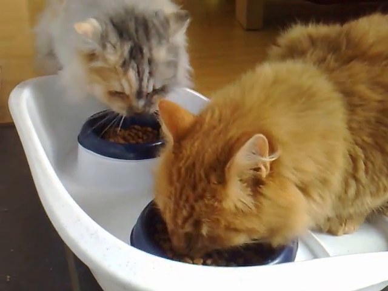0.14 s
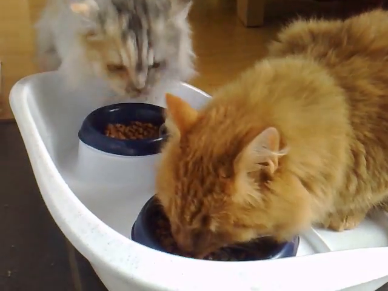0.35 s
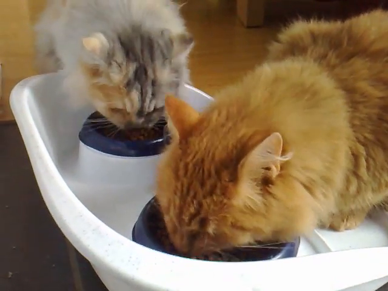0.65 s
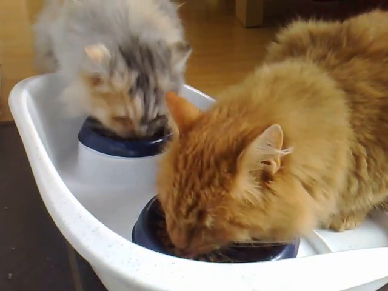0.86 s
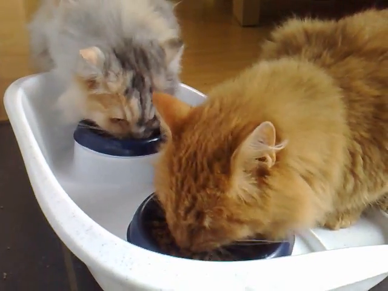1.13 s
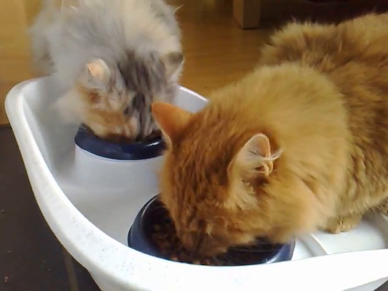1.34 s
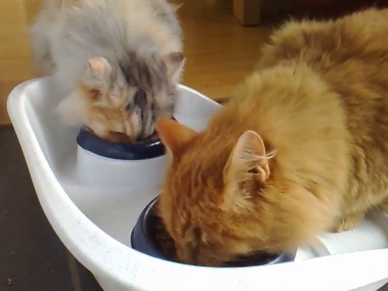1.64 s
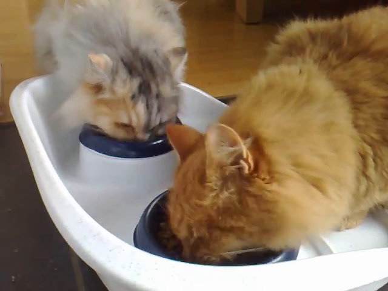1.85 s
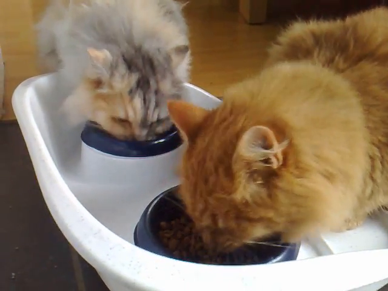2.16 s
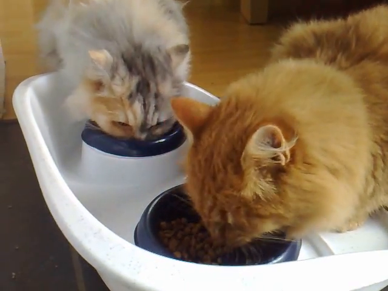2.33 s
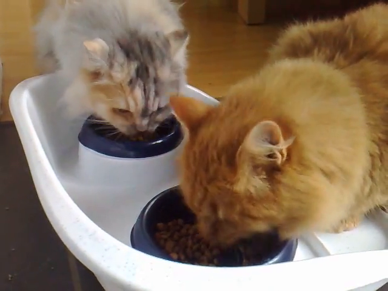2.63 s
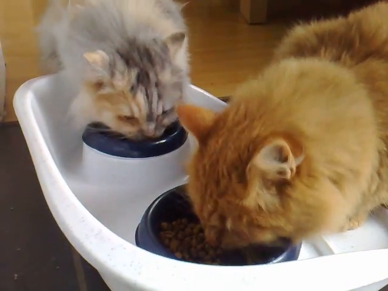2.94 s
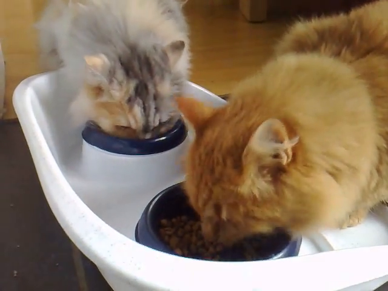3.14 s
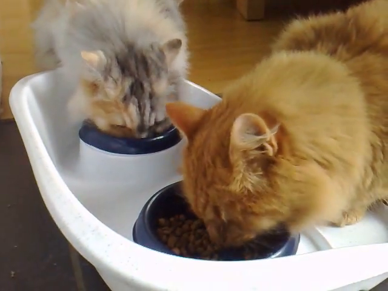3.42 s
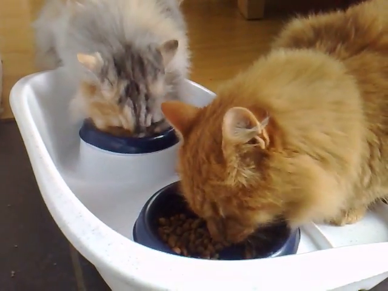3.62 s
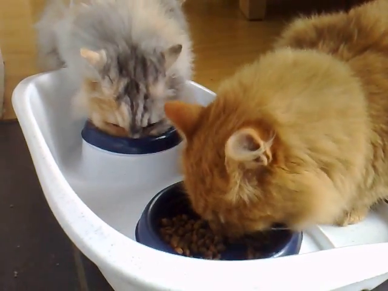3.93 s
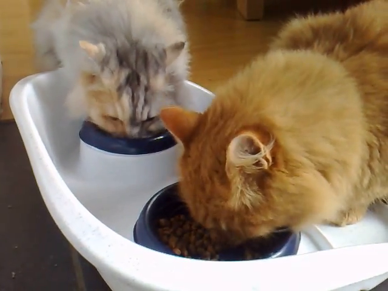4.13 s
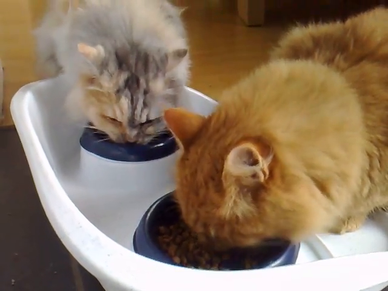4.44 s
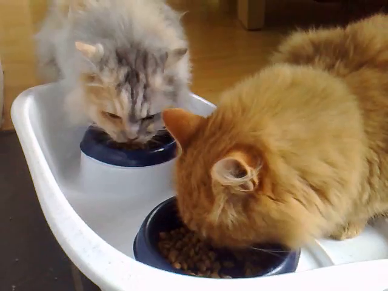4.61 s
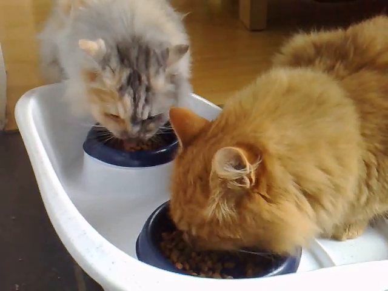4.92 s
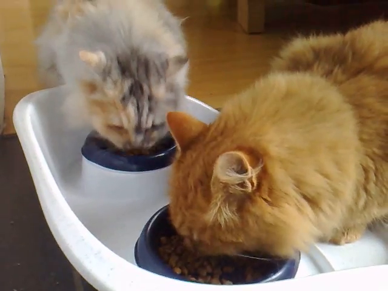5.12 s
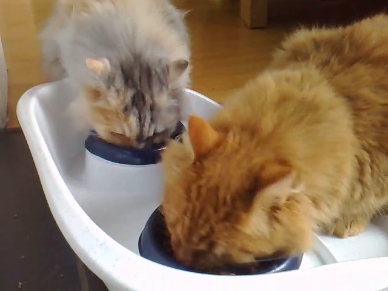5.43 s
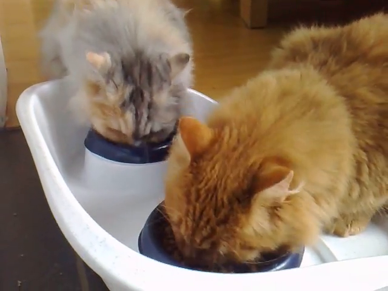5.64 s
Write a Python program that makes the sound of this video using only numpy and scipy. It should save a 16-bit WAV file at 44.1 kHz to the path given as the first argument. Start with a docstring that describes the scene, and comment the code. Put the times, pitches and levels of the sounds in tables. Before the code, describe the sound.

Two cats eat dry kibble from bowls in a plastic tray, indoors and close to a small microphone. Pellets crack crisply between teeth, and knock and shuffle against the bowls in irregular clusters. The eating is busy at first, softens past the middle, then picks up again. Twice a push gives the tray a soft low thud. A faint, steady motor whine and low room noise run underneath.

```python
"""Indoors, close to a small microphone, two cats eat dry kibble from bowls set in a plastic tray.
Pellets crack between teeth, knock and shuffle against the bowls, whose few low modes ring briefly;
twice a push sets the tray swinging. A small fan or motor whines steadily in narrow bands of noise
over rumble, hiss and a faint mains hum."""
import sys
import numpy as np
from scipy import signal
from scipy.fft import rfft, irfft
from scipy.io import wavfile

SR = 44100
rng = np.random.default_rng(int(sys.argv[2]) if len(sys.argv) > 2 else 0)


def wav_out(sig):
    """Save sig, one row per channel (or a flat mono array), as 16-bit PCM at SR to the path in sys.argv[1]."""
    wavfile.write(sys.argv[1], SR, np.round(np.clip(np.atleast_2d(sig).T, -1, 1) * 32767).astype(np.int16))


N = 254456

# The ring of bowl and tray. Each row: pitch in Hz, relative level in dB, t60 in seconds.
BOWL_MODES = [(333, -10.5, 0.02), (440, -6, 0.024), (500, -8, 0.018), (599, -7.5, 0.038),
              (724, -6.5, 0.021), (1020, -3.5, 0.029), (1180, -3, 0.022), (1382, -0.5, 0.019),
              (1800, 4, 0.011)]
# The click of dry pellet and teeth. Each row: pitch in Hz, relative level in dB, t60 in seconds.
PELLET_MODES = [(2060, 1.5, 0.0024), (3440, -3.5, 0.0041), (4250, -5, 0.0034), (5030, -2.5, 0.0026),
                (6210, -10, 0.0085), (7570, -18, 0.0053)]


def from_db(db):
    """Decibels to gain."""
    return 10 ** (np.asarray(db) / 20)


def unit_rms(x):
    """The signal scaled to an rms of 1."""
    return x / np.sqrt(np.mean(x ** 2) + 1e-20)


def high_pass(x, hz):
    """Small bodies radiate little below their lowest mode."""
    return signal.sosfilt(signal.butter(4, hz, "high", fs=SR, output="sos"), x)


def soften(x):
    """Rounded contacts carry little treble, and the bowl radiates little bass."""
    return high_pass(signal.sosfilt(signal.butter(2, 2300, fs=SR, output="sos"), x), hz=250)


def ring(clicks, hz, t60):
    """Each click sets a damped sine ringing."""
    r, w = from_db(-60 / (t60 * SR)), 2 * np.pi * hz / SR
    return signal.lfilter([0, np.sin(w)], [1, -2 * r * np.cos(w), r * r], clicks + 1e-18)


def drift(rate_hz):
    """A smooth random wander with a spread of about 1."""
    r = np.exp(-2 * np.pi * rate_hz / SR)
    return unit_rms(signal.lfilter([1], [1, -2 * r, r * r], rng.standard_normal(N + SR)))[SR:]


def bursts(times, peaks, hz, t60, rise_s, decay_s, clicks_per_s):
    """Each contact is a quick swell of uneven clicks that rings one mode up to the given peak."""
    t = np.arange(SR // 8) / SR
    swell = (1 - np.exp(-(t + 1 / SR) / rise_s)) * np.exp(-t / decay_s)
    hits = rng.random((len(times), len(t))) < clicks_per_s / SR
    clicks = hits * rng.standard_normal(hits.shape) * swell
    out = np.zeros(N + len(t))
    for start_s, peak, ringing in zip(times, peaks, ring(clicks, hz, t60)):
        start = round(start_s * SR)
        out[start:start + len(t)] += peak * ringing / np.max(np.abs(ringing))
    return out[:N]


def grains(modes, per_s, spread_db):
    """Random small contacts, a few larger than the rest, dealt among the modes; one row a mode."""
    sizes = from_db(spread_db * np.minimum(rng.exponential(1, N), 4)) * rng.choice([-1, 1], N)
    clicks = sizes * (rng.random(N) < per_s / SR)
    dealt = rng.integers(0, len(modes), N)
    rings = [from_db(db) * ring(clicks * (dealt == k), hz, t60) for k, (hz, db, t60) in enumerate(modes)]
    return unit_rms(np.array(rings)) / np.sqrt(len(modes))


def nearness(hz, centre_hz, db_per_octave):
    """A mode rings less the further it lies from where a blow is strongest."""
    return from_db(-db_per_octave * np.abs(np.log2(hz / centre_hz)))


def motor_whine():
    """A small fan or motor sings in narrow noise resonances, its level fluttering a little."""
    # The bands of the whine. Each row: centre in Hz, width in Hz, level in dB.
    bands = [(1622, 53, -65.5), (1707.4, 106, -57), (1834, 107, -66), (2120, 22, -74.5), (4050, 440, -68.5),
             (6194, 220, -69.5), (8120, 91, -80.5)]
    out, flutter_db = np.zeros(N), 2.14 * drift(rate_hz=39)
    for hz, width_hz, level_db in bands:
        r = np.exp(-np.pi * width_hz / SR)
        band = rng.standard_normal(N)
        for _ in range(2):   # twice through, for steep skirts
            band = signal.lfilter([1, 0, -1], [1, -2 * r * np.cos(2 * np.pi * hz / SR), r * r], band)
        out += from_db(level_db) * unit_rms(band)
    return out * from_db(flutter_db)


def room_tone(level_db=-58):
    """Room rumble and microphone hiss make one steady bed of coloured noise."""
    # The colour of the bed. Each row: frequency in Hz, relative noise density in dB.
    curve = [(20, 1), (45, -10), (120, 2.5), (250, -5.5), (600, -9), (950, -13.5), (1500, -8.5),
             (2400, -13), (3400, -16), (5200, -19), (7500, -17.5), (9800, -24.5), (15500, -21.5)]
    curve_hz, curve_db = np.transpose(curve)
    hz = np.fft.rfftfreq(N, 1 / SR)
    colour = from_db(np.interp(np.log(hz + 1), np.log(curve_hz), curve_db)) * (hz > 15)
    return from_db(level_db) * unit_rms(irfft(rfft(rng.standard_normal(N)) * colour, N))


def mains_hum():
    """The mains hums in two low tones, each wavering slightly in phase."""
    # The tones of the hum. Each row: pitch in Hz, rms level in dB.
    tones = [(48.4, -70.5), (96.9, -73)]
    t = np.arange(N) / SR
    return sum(np.sqrt(2) * from_db(db) * np.sin(2 * np.pi * hz * t + 0.26 * drift(rate_hz=4.2))
               for hz, db in tones)


def kibble_shuffle(swell_db_per_s=710, fade_db_per_s=550):
    """Dense pellet contacts drive the bowl, most near one pitch; the sharper ones also click."""
    # Spells of pellets ground and pushed about. Each row: start of full strength in seconds,
    # hold in seconds, bowl rumble in dB, centre of the ring in Hz, pellet crackle in dB.
    spells = [(0.0, 0.017, -43.5, 675, -60), (0.092, 0.087, -53.5, 760, -67),
              (0.27, 0.044, -51.5, 690, -66), (0.39, 0.0075, -49, 680, -62), (0.56, 0.027, -48, 496, -56),
              (0.62, 0.077, -52, 580, -62), (0.754, 0.035, -39.5, 625, -54),
              (0.968, 0.038, -46, 630, -52.5), (1.108, 0.042, -55, 634, -60.5),
              (1.745, .025, -46, 730, -72), (1.854, 0.0059, -36.5, 550, -70),
              (1.945, 0.056, -42.5, 600, -60), (2.02, 0.099, -37, 670, -55.5), (2.18, 0.058, -52, 700, -62),
              (2.375, 0.12, -44.5, 646, -61), (2.706, .01, -48, 760, -72), (3.35, 0.077, -56.5, 472, -82),
              (3.485, 0.027, -53, 440, -82), (3.68, .03, -53.5, 497, -81), (3.808, .01, -58, 487, -65),
              (4.042, 0.02, -52.5, 490, -71), (4.085, 0.015, -46.5, 490, -68), (4.12, 0.054, -58, 505, -64),
              (4.226, 0.042, -44.5, 465, -66), (4.41, 0.054, -58.5, 500, -74),
              (4.74, 0.024, -48.5, 460, -61), (4.8, 0.14, -55, 450, -70), (5.005, 0.0059, -51.5, 810, -62),
              (5.295, 0.069, -45, 690, -60.5), (5.43, .17, -56, 700, -73), (5.679, 0.066, -38.5, 714, -59)]
    t = np.arange(N) / SR
    rumble, crackle, weighted_hz = np.full(N, 1e-12), np.zeros(N), np.zeros(N)
    for start_s, hold_s, rumble_db, centre_hz, crackle_db in spells:
        before_s, after_s = np.maximum(start_s - t, 0), np.maximum(t - start_s - hold_s, 0)
        effort = from_db(-swell_db_per_s * before_s - fade_db_per_s * after_s)
        rumble += from_db(rumble_db) * effort
        weighted_hz += from_db(rumble_db) * effort * centre_hz
        crackle += from_db(crackle_db) * effort
    mode_gains = nearness(np.array(BOWL_MODES)[:, :1], weighted_hz / rumble + 1, db_per_octave=12)
    bowl = np.sum(mode_gains * grains(BOWL_MODES, per_s=6000, spread_db=3.0), axis=0)
    pellets = np.sum(grains(PELLET_MODES, per_s=3300, spread_db=0.5), axis=0)
    return rumble * soften(bowl) + crackle * high_pass(pellets, hz=1190)


def pellet_cracks():
    """A pellet splits in a few milliseconds of fractures that ring its small, heavily damped modes."""
    # Pellets cracking between teeth. Each row: start in seconds, level in dB, centre in Hz,
    # top octave in dB against that level.
    bites = [(0.0144, -38.5, 2330, -33), (0.054, -30, 4440, -40), (0.079, -29, 3500, -37),
             (0.2965, -39.5, 3870, -25), (0.389, -31.5, 2760, -36), (0.532, -29.5, 3800, -39),
             (0.5755, -28.5, 3270, -37), (0.614, -41, 4010, -25), (0.6544, -35.5, 4140, -27),
             (0.7388, -21.5, 5100, -13), (0.753, -31, 3240, -18), (0.9642, -35.5, 3820, -25),
             (0.9986, -34, 5100, -17), (1.107, -29.5, 3840, -21), (1.1333, -33.5, 5840, -32),
             (1.7545, -30.5, 3970, -33), (2.001, -42, 4320, -24), (2.0186, -33, 3600, -28),
             (2.038, -26, 5040, -10), (2.0463, -26, 5030, -22), (2.1127, -35.5, 4900, -32),
             (2.1797, -27.5, 3670, -36), (2.207, -33.5, 3020, -28), (2.2588, -39.5, 3850, -27),
             (2.378, -41, 4080, -26), (2.387, -41.5, 3360, -21), (2.426, -25, 2140, -5),
             (2.4659, -22.5, 3180, -39), (2.6941, -14.5, 5250, -2), (2.6988, -31, 5550, 8),
             (2.7475, -39, 3720, -23), (2.853, -29.5, 3380, -37), (3.061, -32.5, 6060, -14),
             (4.087, -45, 4500, -25), (4.153, -48, 3600, -25), (4.2025, -44, 5200, -23),
             (4.2707, -41, 4200, -25), (4.389, -34.5, 4250, -31), (4.7452, -30, 3440, -39),
             (4.7558, -37, 3660, -26), (4.8913, -36, 3420, -27), (5.1495, -45, 5000, -22),
             (5.5512, -29, 4400, -43), (5.673, -38, 3160, -27), (5.6857, -41, 5230, -29),
             (5.693, -40, 5040, -27), (5.7004, -35, 4000, -28), (5.7477, -32, 3010, -31)]
    # The crisp top octave of a crack. Each row: pitch in Hz, relative level in dB, t60 in seconds.
    top_modes = [(7900, 4.5, 0.00043), (10000, -14, 0.0018), (10220, -1.5, 0.0025), (12400, -12, 0.0014),
                 (14900, -22, 0.0016)]
    starts, level_db, centre_hz, top_db = np.transpose(bites)
    fractures = dict(decay_s=0.0014, clicks_per_s=11000)
    out = np.zeros(N)
    for hz, mode_db, t60 in PELLET_MODES:
        peaks = from_db(level_db + mode_db) * nearness(hz, centre_hz, db_per_octave=16)
        out += bursts(starts, peaks, hz, t60, rise_s=0.00039, **fractures)
    for hz, mode_db, t60 in top_modes:
        peaks = from_db(level_db + top_db + mode_db)
        out += bursts(starts, peaks, hz, t60, rise_s=0.00006, **fractures)
    return high_pass(out, hz=810)


def bowl_knocks():
    """Pellets and muzzles bump the bowls and set their modes ringing in a short, soft rattle."""
    # Bumps on the bowls. Each row: start in seconds, level in dB, centre of the ring in Hz,
    # fall-off from that centre in dB per octave.
    knocks = [(0.055, -32, 690, 10), (0.079, -35, 1040, 5.5), (0.3, -43, 1060, 10), (0.329, -37.5, 590, 17),
              (0.39, -40, 766, 10), (0.502, -37.5, 525, 11), (0.533, -37.5, 750, 14),
              (0.561, -33.5, 1460, 2), (0.575, -33, 1370, 11), (0.699, -39.5, 607, 6),
              (0.74, -32, 1180, 17), (0.752, -38.5, 533, 5), (0.763, -40, 600, 1), (0.965, -45, 595, -1.5),
              (1.109, -40.5, 650, 17), (1.708, -40.5, 620, 14), (1.756, -27.5, 685, 13.5),
              (1.845, -27.5, 860, 17), (1.939, -40, 1020, 10), (1.961, -37, 564, 4.5),
              (2.021, -30.5, 592, 7.5), (2.044, -35, 622, 2), (2.179, -34, 940, 18),
              (2.208, -34.5, 447, 11), (2.26, -41.5, 1020, 12), (2.367, -41.5, 453, 2),
              (2.389, -32.5, 401, 5), (2.425, -36.5, 1440, -0.5), (2.467, -31, 790, 10),
              (2.696, -29.5, 650, 8.5), (2.853, -36.5, 1020, 16), (3.063, -45.5, 1020, 23),
              (3.432, -39.5, 480, 21), (3.489, -36.5, 400, 17), (3.705, -38.5, 493, 21),
              (3.803, -44, 425, 11), (4.041, -37, 490, 18), (4.09, -33, 480, 10), (4.225, -35.5, 428, 16),
              (4.452, -46.5, 425, 3.5), (4.745, -36.5, 425, 9), (4.863, -39, 428, 15),
              (4.996, -42, 800, 18), (5.112, -41, 750, 21), (5.294, -35.5, 640, 10), (5.344, -36.5, 800, 5),
              (5.484, -39, 1010, 12), (5.501, -29.5, 656, 12.5), (5.549, -35.5, 1330, 12.5),
              (5.614, -37, 393, 13.5), (5.748, -23, 623, 21.5)]
    starts, level_db, centre_hz, db_per_octave = np.transpose(knocks)
    out = np.zeros(N)
    for hz, mode_db, t60 in BOWL_MODES:
        peaks = from_db(level_db + mode_db) * nearness(hz, centre_hz, db_per_octave)
        out += bursts(starts, peaks, hz, t60, rise_s=0.0006, decay_s=0.0025, clicks_per_s=2300)
    return soften(out)


def reflections(x, t60=0.16, level_db=-10):
    """Tray, floor and walls throw back a short noisy tail, the treble dying first."""
    t = np.arange(SR // 2) / SR
    white = rng.standard_normal(len(t)) * (t > .003)   # the first bounce arrives after 3 ms
    dull = signal.lfilter([.45], [1, -.55], white)
    tail = dull * from_db(-60 * t / t60) + (white - dull) * from_db(-60 * t / (0.35 * t60))
    return from_db(level_db) * signal.fftconvolve(x, tail / np.sqrt(np.sum(tail ** 2)))[:N]


def tray_nudges():
    """A soft push moves the whole tray: a low swing damped within a few cycles."""
    # Two pushes, each a thud and then a deeper swing. Each row: start in seconds, level in dB, pitch in Hz.
    nudges = [(1.844, -36, 194), (1.867, -44, 55.7), (5.5, -40, 267), (5.519, -47, 58.7)]
    push = dict(rise_s=0.00081, decay_s=0.00094, clicks_per_s=4900)
    swings = sum(bursts([start_s], [from_db(db)], hz, t60=3.1 / hz, **push) for start_s, db, hz in nudges)
    return signal.sosfilt(signal.butter(2, 500, fs=SR, output="sos"), swings)


def scene():
    """The eating sounds with their reflections, over the steady background, in mono."""
    eating = pellet_cracks() + bowl_knocks() + kibble_shuffle()
    return (eating + reflections(eating) + tray_nudges() + motor_whine() + room_tone() + mains_hum())[None]


def record(dry):
    """A steep low-pass shuts out the highest treble."""
    stop_hz = 16100
    return signal.sosfilt(signal.cheby2(14, 60, stop_hz, fs=SR, output="sos"), dry)


dry = scene()
out = record(dry)
wav_out(out)
```